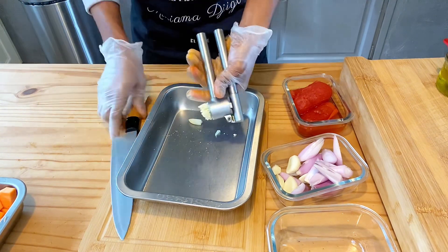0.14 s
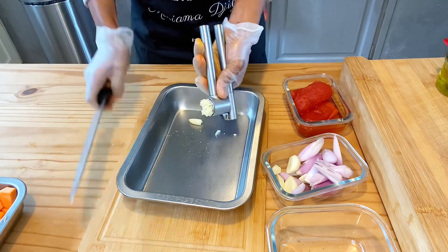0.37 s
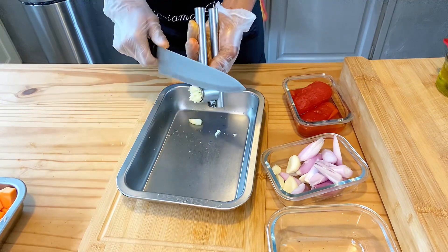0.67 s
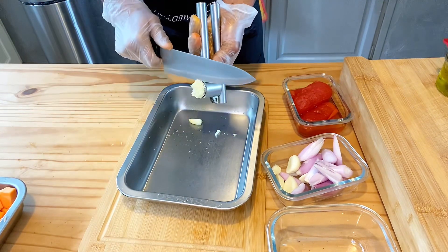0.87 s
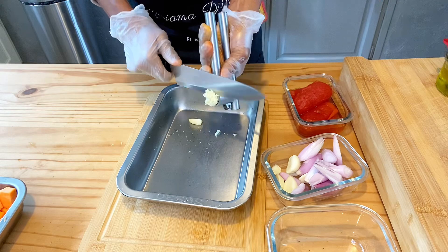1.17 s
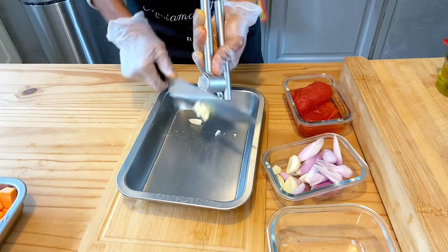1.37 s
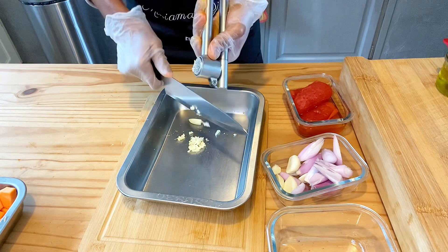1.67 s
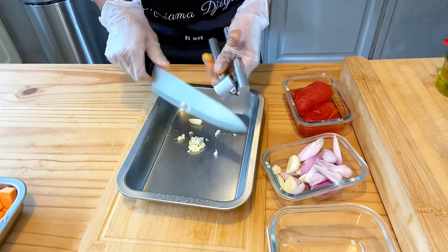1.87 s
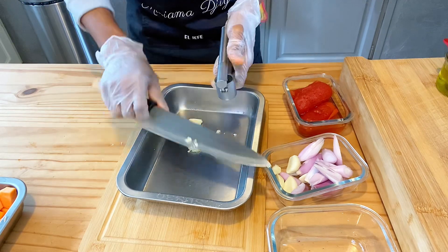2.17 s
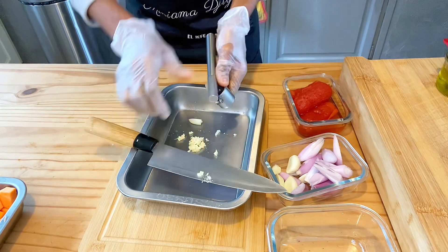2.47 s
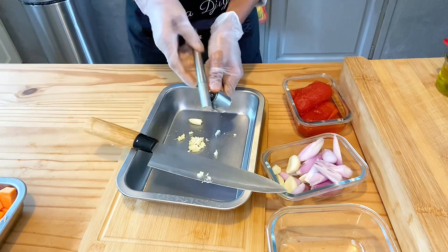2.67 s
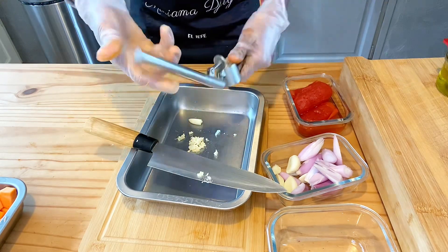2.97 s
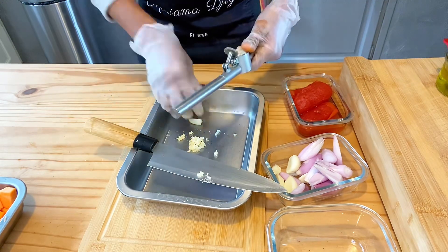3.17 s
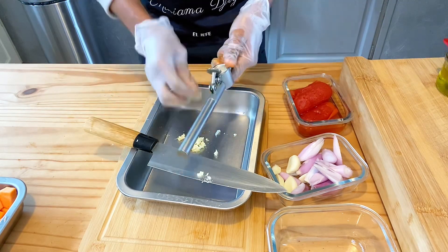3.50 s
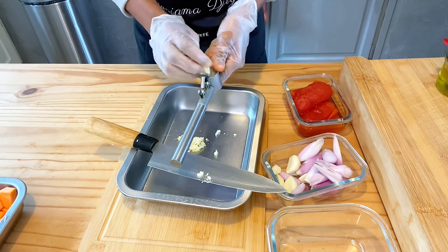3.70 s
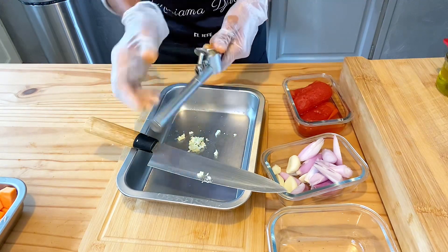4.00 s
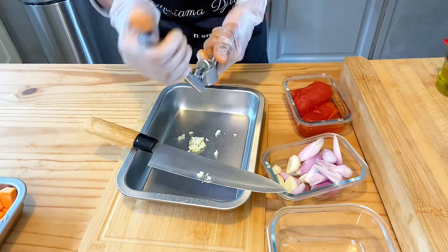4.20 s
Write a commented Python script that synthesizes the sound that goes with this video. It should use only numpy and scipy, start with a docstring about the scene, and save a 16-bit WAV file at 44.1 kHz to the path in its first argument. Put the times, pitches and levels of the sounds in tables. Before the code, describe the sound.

Close stereo pickup in a small, lively kitchen with a quiet low hum. Plastic gloves crinkle, dull bumps and a metallic clip come as a knife is lifted off a steel tray. Short gritty scrapes and a sharp click follow on a metal press. The knife then drops with a loud double clang, rocks to rest in fading taps, and the press hinge clicks lightly amid more rustling.

```python
"""Plastic gloves rustle over the low hum of a small kitchen as a cook picks up a knife beside a steel
tray, scrapes garlic off a metal press and drops the knife across the tray, where it rocks to rest; then
the press is swung open and its hinge clicks. Struck steel is noise clatter plus decaying modes that beat,
scrapes and gloves are crackling noise shaped by each movement, and a diffuse room tail follows."""
import sys
import numpy as np
from scipy import signal
from scipy.fft import rfft, irfft
from scipy.io import wavfile
from scipy.ndimage import uniform_filter1d

SR = 44100
rng = np.random.default_rng(int(sys.argv[2]) if len(sys.argv) > 2 else 0)


def file_out(sig):
    """Save sig as 16-bit WAV at sys.argv[1]."""
    # one column per channel
    cols = np.atleast_2d(sig).T
    # limit, then scale
    lim = np.clip(cols, -1, 1)
    pcm = np.round(lim * 32767).astype(np.int16)
    wavfile.write(sys.argv[1], SR, pcm)


N = 191746

# corner frequencies of the spectrum of a contact, the lowest for its thump: f/Hz
CONTACT_HZ = [130, 900, 3500, 10000]


def amp(db):
    """Level definition: 20 dB is a factor of ten in amplitude."""
    return 10 ** (np.asarray(db) / 20)


def unit(x):
    """Normalization: scales a signal to a root-mean-square value of one."""
    return x / np.sqrt(np.mean(x ** 2) + 1e-20)


def read(points, hz):
    """Interpolation on a logarithmic frequency axis, in equal steps of pitch."""
    f, value = np.transpose(points)
    return np.interp(np.log(hz + 1), np.log(f + 1), value)


def add(mix, s, sound):
    """Superposition: adds a stereo sound to the mix from time s on."""
    start = max(round(s * SR), 0)
    part = mix[:, start:][:, :sound.shape[1]]
    part += sound[:, :part.shape[1]]


def colour(x, points, size=4096):
    """Minimum-phase filtering: a causal response with the given (f/Hz, level/dB) keeps attacks sharp."""
    hz = abs(np.fft.fftfreq(size, 1 / SR))
    log_gain = np.log(amp(read(points, hz)))
    # the Hilbert transform of the log gain is the phase of the causal filter
    response = np.exp(np.conj(signal.hilbert(log_gain)))
    taps = np.fft.ifft(response).real[:size // 2]
    return signal.fftconvolve(x, taps[None], axes=1)[:, :x.shape[1]]


def fade(t, t60):
    """Exponential damping: the amplitude falls by 60 dB in t60 seconds."""
    return np.exp(-np.log(1000) * t / np.maximum(t60, 1e-3))


def pan(x, left_db):
    """Level-difference stereo: the left channel exceeds the right by a further left_db."""
    return x * amp(np.array([[left_db], [-left_db]]) / 2)


def kitchen(hum_db=-73, hiss_hz=8000, hiss_half_width_hz=170, hiss_db=-78):
    """Stationary background: broadband ventilation noise, a sinusoidal hum and resonant high hiss."""
    # ventilation spectrum: f/Hz, relative level/dB
    air_colour = [(20, -9), (35, -4.5), (55, 3.5), (110, -5.5), (180, -1), (330, -7.5), (620, -11.5),
                  (1000, -23.5), (1600, -28.5), (3200, -30.5), (6500, -43.5), (12000, -49.5),
                  (16000, -43.5)]
    air = amp(-57) * unit(colour(rng.standard_normal((2, N)), air_colour))
    hum = amp(hum_db) * unit(np.sin(2 * np.pi * 102.3 * np.arange(N) / SR))
    hz = np.fft.rfftfreq(N, 1 / SR)
    resonance = 1 / (1 + ((hz - hiss_hz) / hiss_half_width_hz) ** 2)
    hiss = irfft(rfft(rng.standard_normal(N)) * resonance, N)
    return air + hum + amp(hiss_db) * unit(hiss)


def room(x, delay_s=0.0013, build_s=0.00067):
    """Diffuse reverberation: sparse echoes swell quickly and decay at a rate set by frequency."""
    # reverberation time: f/Hz, t60/s
    decay_times = [(100, 0), (400, 0.77), (1200, 0.46), (3000, 0.5472), (7000, 0.38), (13000, 0.39)]
    # spectrum of the reverberant answer: f/Hz, level/dB
    answer_colour = [(60, -4), (200, -2.5), (500, -9.5), (1200, -5), (3500, -4.5), (8000, -5),
                     (13000, -9.5)]
    echoes_per_s = 5000
    echoes = rng.standard_normal((2, SR)) * (rng.random((2, SR)) < echoes_per_s / SR)
    hz, t, bands = signal.stft(echoes, SR, nperseg=256)
    dying = bands * fade(t, read(decay_times, hz)[:, None])
    tail = signal.istft(dying, SR, nperseg=256)[1][:, :SR]
    since_delay = np.maximum(np.arange(SR) / SR - delay_s, 0)
    tail = tail * (1 - np.exp(-since_delay / build_s))
    # unit energy in each channel before colouring
    tail = colour(tail / np.linalg.norm(tail, axis=1, keepdims=True), answer_colour)
    return signal.fftconvolve(x, tail, axes=1)[:, :N]


def crackle(per_s, spread_db, smooth):
    """Shot noise: random snaps of unequal size, each decaying quickly, over a smooth hiss."""
    sizes = amp(spread_db * np.minimum(rng.exponential(1, N), 4))
    snaps = (rng.random(N) < per_s / SR) * sizes
    decay_s = 0.00078
    grains = signal.lfilter([1], [1, -np.exp(-1 / (decay_s * SR))], snaps)
    return unit(rng.standard_normal((2, N)) * (unit(grains) + smooth))


def gloves(level_db=-2, flutter_db=-0.4):
    """Buckling film: thin plastic crinkles in little clumps, swelling and fading with each movement."""
    # changes of grip: t/s of the middle, length/s between the 1/e points, relative level/dB
    grips = [(0.01, 0.15, -55.5), (0.144, 0.011, -47.5), (0.205, 0.076, -48), (.41, 0.037, -48),
             (0.513, 0.12, -58), (0.739, 0.027, -58), (0.927, 0.12, -68), (2.094, 0.9, -59.5),
             (2.642, 0.17, -50), (2.963, 0.063, -56), (3.754, 0.079, -52), (3.868, 0.096, -52.5),
             (4.013, 0.13, -60.5), (4.226, 0.16, -48.5)]
    # spectrum of the crinkling: f/Hz, relative level/dB
    film_colour = [(300, -19.5), (900, -10.5), (1900, -2), (3200, -1.5), (5000, -2.5), (8000, -3),
                   (11000, -3), (13000, -1), (15000, -8.5)]
    t = np.arange(N) / SR
    effort = amp(-78)  # the fingers at rest
    for s, length, db in grips:
        effort = effort + amp(db) * np.exp(-(2 * (t - s) / length) ** 2)
    clumps = unit(uniform_filter1d(rng.standard_normal(N), size=600))
    snaps = crackle(per_s=700, spread_db=3, smooth=1)
    return effort * amp(level_db + flutter_db * clumps) * unit(colour(snaps, film_colour))


def scrapes():
    """Stick-slip friction: the edge catches on the holes of the sieve during each short stroke."""
    # strokes that wipe garlic off the sieve: t/s of the middle, length/s, relative level/dB
    strokes = [(1.187, 0.021, -35.5), (1.195, 0.049, -40), (1.356, 0.0079, -45), (1.375, 0.042, -42.5),
               (1.601, 0.025, -29.5)]
    # spectrum of the friction: f/Hz, relative level/dB
    friction_colour = [(100, -2.5), (700, -12), (1500, -11.5), (2600, -3.5), (3000, -4), (3500, -6.5),
                       (5500, -11), (8500, -4), (12000, -3.5), (15000, -3.5)]
    t = np.arange(N) / SR
    stroke = 0
    for s, length, db in strokes:
        stroke = stroke + amp(db) * np.cos(np.pi * np.clip((t - s) / length, -.5, .5))
    snags = crackle(per_s=1800, spread_db=3.5, smooth=.4)
    return stroke * unit(colour(snags, friction_colour))


def cluster(t, hz, width, phase, count=12):
    """Beating: close modes interfere, and each microphone hears its own mixture of phases."""
    offsets = np.linspace(-1, 1, count) + 0.12 * rng.standard_normal(count)
    near_hz = hz * (1 + width * offsets)
    phases = 2 * np.pi * rng.random(count) + phase * rng.standard_normal((2, count))
    weights = np.hanning(count) * np.exp(1j * phases)
    return (weights @ np.exp(2j * np.pi * near_hz[:, None] * t)).imag


def strike(blows, modes, rise, spread, note_hold, note_width, detune, body_db, split=0.0036):
    """Modal excitation: a blow sets off crowded-mode clatter, a rough local note and a longer body ring.

    rise/s is the onset of contact, spread/rad the phase scatter between microphones; note_width, detune
    and split are fractions of a frequency, note_hold is the note's t60 as a multiple of the clatter's."""
    out, t = np.zeros((2, N)), np.arange(SR // 2) / SR
    contact = 1 - np.exp(-t / rise)
    mode_hz, mode_db, mode_t60 = np.transpose(modes)[:, :, None]
    for s, *band_db, t60, ring_db, note_hz, note_db in blows:
        clatter = rng.standard_normal((2, len(t))) * fade(t, t60)
        # the changing grip shifts the modes a little from blow to blow
        hz = mode_hz * (1 + detune * rng.standard_normal(mode_hz.shape))
        rings = amp(body_db + ring_db + mode_db) * fade(t, mode_t60) * np.exp(2j * np.pi * hz * t)
        # the modes come in close pairs, which beat
        rings = rings * np.cos(2 * np.pi * split * hz * rng.uniform(0.64, 1, hz.shape) * t)
        # each microphone hears the modes in a slightly different phase
        phase = 2 * np.pi * rng.random(len(modes)) + spread * rng.standard_normal((2, len(modes)))
        ring = (np.exp(1j * phase) @ rings).imag
        dying = fade(t, note_hold * t60)
        note = unit(dying * cluster(t, note_hz, note_width, spread))
        # as strong as a sine of amplitude amp(note_db) with the same decay
        note = amp(note_db) * note * np.sqrt(np.mean(dying ** 2) / 2)
        impact = colour((clatter + ring) * contact, list(zip(CONTACT_HZ, band_db)))
        add(out, s, impact + note * contact)
    return out


def blow(s, db, hardness, thump_db, t60, ring_db, note_hz, note_db):
    """Contact stiffness: a harder contact is brighter; the weight behind it adds a thump."""
    octaves = np.log2(np.array(CONTACT_HZ[1:]) / CONTACT_HZ[1])
    return (s, db + thump_db, *(db + hardness * octaves), t60, ring_db, note_hz, db + note_db)


def clicks():
    """Light impact: short contacts of the hand-held press with the blade and at its own hinge."""
    # t/s, strength/dB, hardness/(dB per octave), t60/s, note of the struck spot f/Hz,
    # note level/dB relative to the strength
    contacts = [(1.491, -33, -6, .15, 1574, -17), (1.572, -18.5, -0.5, 0.017, 1217, -12.5),
                (1.603, -26, -0.8, 0.0095, 2400, -9), (1.624, -11.5, -0.1, 0.0076, 2220, -11.5),
                (1.631, -22.5, -0.2, 0.024, 3070, -11), (1.927, -44.5, -2, 0.026, 2334, -4),
                (1.950, -31, -1, 0.01, 5200, -16), (2.7064, -24.5, 0.1, 0.0098, 7300, -10.5),
                (3.059, -45.5, 8, 0.0081, 8400, 10), (3.068, -24, 1.32, 0.029, 528, -20.5),
                (3.447, -38, -2.5, 0.0055, 2420, -9.5), (4.122, -31, 0.4, .03, 590, -38),
                (4.1873, -44, 6.5, 0.011, 11880, 11.5), (4.257, -46, 3, 0.017, 5040, 0.5),
                (4.327, -38.5, -0.2, 0.043, 2180, -12.5), (4.3435, -27.5, 1.5, 0.012, 8450, -13)]
    return [blow(s, db, hardness, thump_db=-14, t60=t60, ring_db=-22.5, note_hz=hz, note_db=note_db)
            for s, db, hardness, t60, hz, note_db in contacts]


def press():
    """Modal radiation: the press, and the blade held against it, ring at their shared modes."""
    # modes: f/Hz, relative level/dB, t60/s
    modes = [(560, -27, 0.61), (1154, -7.5, 0.15), (1710, -8.5, 0.21), (2160, -10.5, .3), (2400, 0, 0.38),
             (2670, -7.5, 0.19), (3160, -3.5, 0.51), (5050, -5, 0.33), (4680, -9.5, 0.15), (7190, 1, 0.106),
             (8850, -2, 0.36), (10440, -2.5, 0.24), (12100, -1, 0.086), (13300, -12.5, 0.16)]
    # radiation of the press: f/Hz, level/dB
    radiation = [(150, 3.5), (500, 8), (850, -2), (1300, 0.5), (2200, 0.5), (3200, 0), (5500, 0), (9000, 0),
                 (13000, -1.5)]
    sound = strike(clicks(), modes, rise=0.00027, spread=0.46, note_hold=4.4, note_width=0.14,
                   detune=0.011, body_db=-6)
    return colour(sound, radiation)


def thuds():
    """Soft impact: dull bumps of hand and knife handle on board and tray share one falling spectrum."""
    # t/s, strength/dB, note of the struck spot f/Hz
    bumps = [(0.147, -23, 189.6), (0.177, -19.5, 303), (0.213, -16.5, 425), (0.291, -20.5, 370.3),
             (3.312, -20.5, 78.7), (3.36, -26.5, 56.4)]
    dull_db = np.array([0.5, -11.5, -25, -37])  # at each of CONTACT_HZ
    t60, ring_db, note_db = .15, -21, -13.5
    return [(s, *(db + dull_db), t60, ring_db, hz, db + note_db) for s, db, hz in bumps]


def rocking(count=8):
    """Energy loss: the knife rocks on the rim, each tap sooner, weaker and duller than the last."""
    start_s, gap_s, shrink = 2.473, .108, .82  # each gap is this share of the one before
    taps = []
    for k in range(count):
        # sum of the geometric series of gaps
        s = start_s + gap_s * (1 - shrink ** k) / (1 - shrink)
        db = -25 - 1.8 * k
        hardness = -3.05 - 0.49 * k  # dB per octave
        taps.append(blow(s, db, hardness, thump_db=-4, t60=0.15, ring_db=-15.5,
                         note_hz=1694, note_db=-17.5))
    return taps


def knocks():
    """Impact: the blade clips the tray as it is lifted, lands and bounces; later the tray is knocked again."""
    # t/s, strength/dB, hardness/(dB per octave), thump level/dB, tray ring level/dB,
    # note of the struck spot f/Hz, note level/dB; thump, ring and note are relative to the strength
    contacts = [(0.2231, -15, -9, -2, -15, 416, -13.5), (0.2437, -21.5, 0.25, -24, -18.5, 4400, -6.5),
                (0.2515, -9, -4, -3, -27.5, 1470, -9), (0.257, -22.5, -9.5, -7, -14.5, 2250, -2),
                (2.2934, -2.5, -2.5, -9, -18, 5750, -16.5), (2.301, -5.5, -2, -7, -14.5, 142, -27),
                (2.3118, -16, 0.5, -3, -7.5, 4450, -16), (2.3606, 3, -7.5, -16.5, -13.5, 1313, -15),
                (2.371, -8.5, -10, 0.5, -17.5, 3276, -7.5), (2.3805, 0, -10, -12, -20, 717, -10),
                (2.391, -1.5, -8, -12.5, -23.5, 774, -14), (3.265, -29, -3, 2.5, -14, 420, -9),
                (3.2917, -19, -4, 6, -26, 5310, -25)]
    neutral_t60_s = 0.074  # clatter of a knock of zero hardness
    softening = 28  # a softer knock clatters longer: t60 doubles for this loss in dB per octave
    blows = []
    for s, db, hardness, thump_db, ring_db, hz, note_db in contacts:
        t60 = neutral_t60_s * 2 ** (-hardness / softening)
        blows.append(blow(s, db, hardness, thump_db, t60, ring_db, hz, note_db))
    return blows


def tray():
    """Modal radiation: the tray on its board, with the blade lying on it, rings at its plate modes."""
    # modes: f/Hz, relative level/dB, t60/s
    modes = [(57, -1, .6), (76, -8, .5), (143, -1, .4), (292, -4, .35), (394, -5, .3), (690, -2, .3),
             (718, 2, .35), (807, -3, .35), (865, -5, .4), (978, -1, .35), (1018, -7, .4), (1128, -7, .3),
             (1305, 0, .5), (1349, -1, .55), (1490, -2, .55), (1799, -3, .55), (1994, -3, .35),
             (2245, -7, .35), (2483, -4, .45), (3040, -2, .22), (3268, 2, .17), (4382, -3, .25),
             (4509, -3, .3), (4718, -7, .25), (5819, -8, .14), (7697, -3, .2), (9695, -4, .14),
             (11138, -3, .15)]
    # radiation of the tray: f/Hz, level/dB
    radiation = [(60, -4.5), (150, 4), (250, -2), (400, -0.5), (550, 1.5), (720, -3.5), (1200, -1.5),
                 (1750, 0), (2200, -1), (2800, -4.5), (3800, -1), (5000, 1.5), (7000, -0.5), (13000, -0.5)]
    sound = strike(knocks() + thuds() + rocking(), modes, rise=0.00034, spread=0.38, note_hold=1.0,
                   note_width=.11, detune=0.00099, body_db=-8)
    return colour(sound, radiation)


def scene():
    """Superposition: tray, press and gloves excite the room; the kitchen noise is added after it."""
    near = pan(tray(), left_db=1.5) + pan(press() + scrapes() + gloves(), left_db=0.7)
    return near + room(near) + pan(kitchen(), left_db=3.5)


def record(dry):
    """Sum-and-difference stereo: separate mid and side spectra set the width by frequency; then a band limit."""
    # response to half the sum of the channels: f/Hz, level/dB
    mid_colour = [(25, -12), (55, -0.5), (130, -0.5), (240, -3.5), (700, -1.5), (2000, -2), (5000, -2.5),
                  (8000, -1), (11000, -0.5), (13000, -6), (14200, -19.5), (16000, -31.5)]
    # response to half their difference: f/Hz, level/dB
    side_colour = [(25, -14.5), (60, -5), (140, -8.5), (380, -5.5), (700, 1), (2400, -4), (5200, -2),
                   (7000, -7), (9500, -38.5), (11500, -10), (13500, -0.5), (16000, -12.5)]
    mid = colour(dry.mean(0)[None], mid_colour)
    side = colour((dry[:1] - dry[1:]) / 2, side_colour)
    low_pass = signal.firwin(511, 16300, window=("kaiser", 9), fs=SR)  # cutoff in Hz
    return signal.oaconvolve(np.vstack([mid + side, mid - side]), low_pass[None], "same")


dry = scene()
out = record(dry)
file_out(out)
```